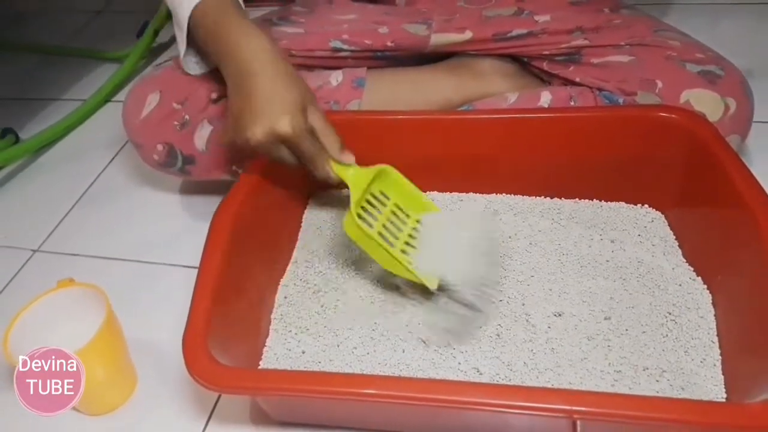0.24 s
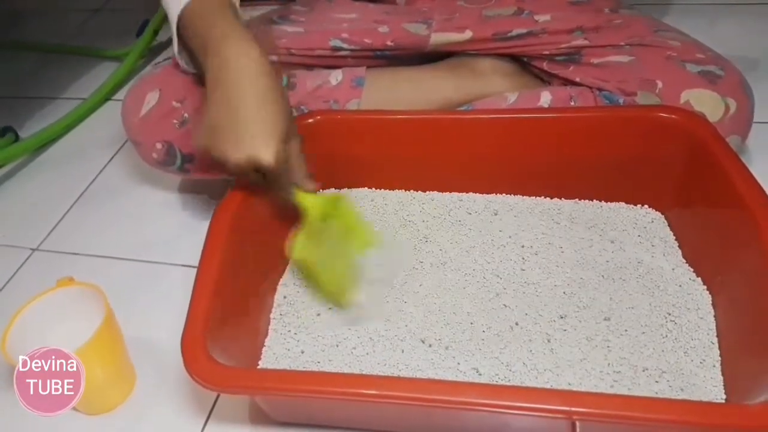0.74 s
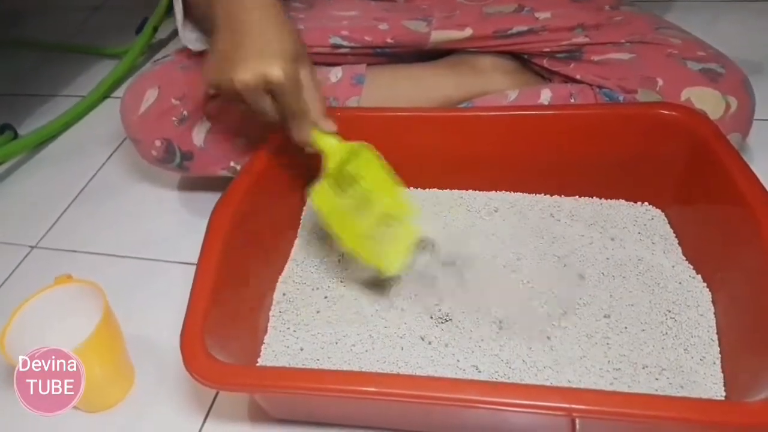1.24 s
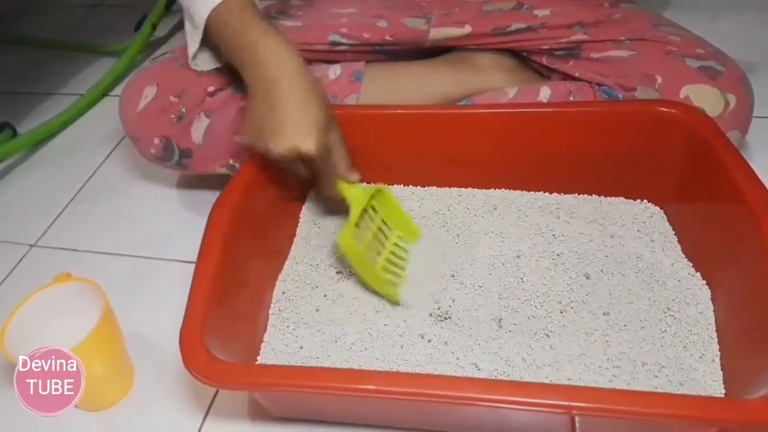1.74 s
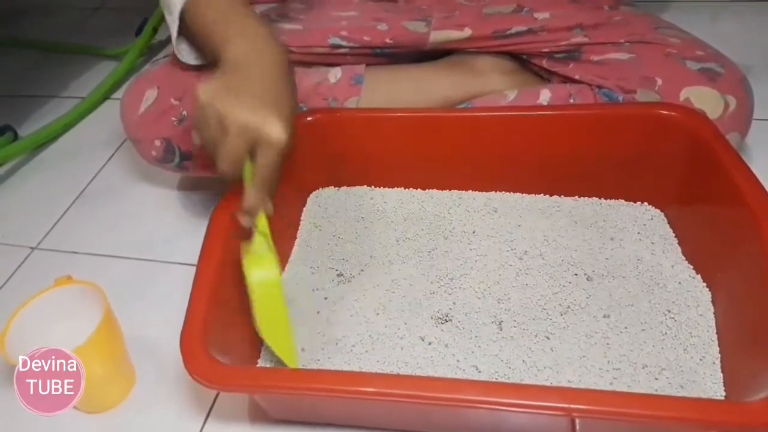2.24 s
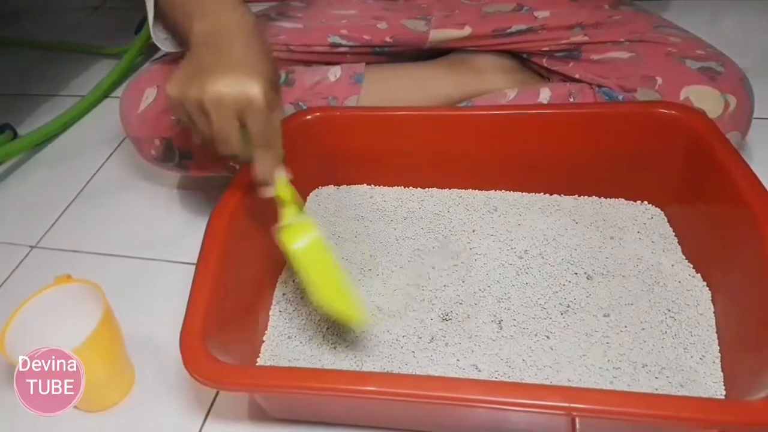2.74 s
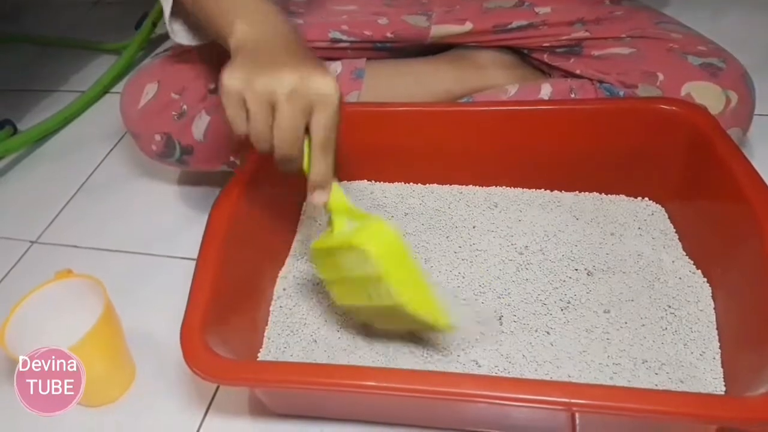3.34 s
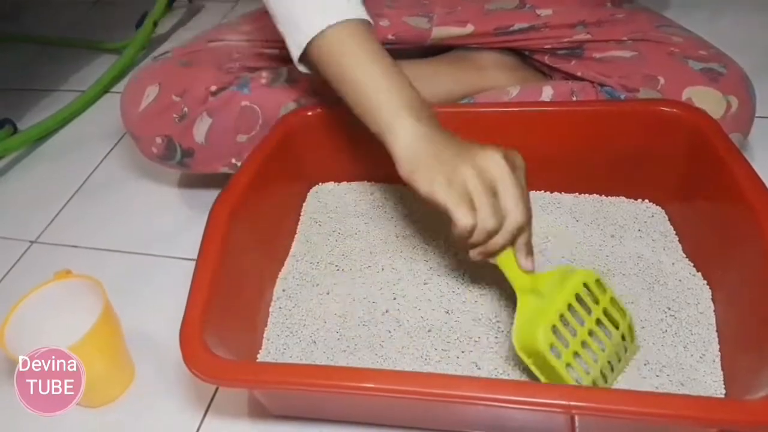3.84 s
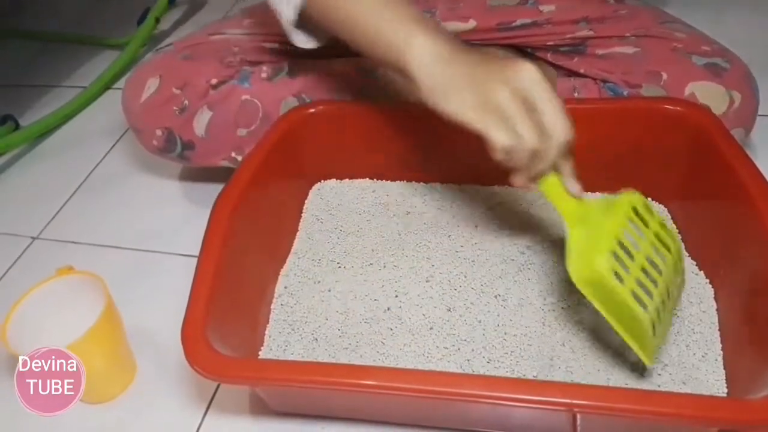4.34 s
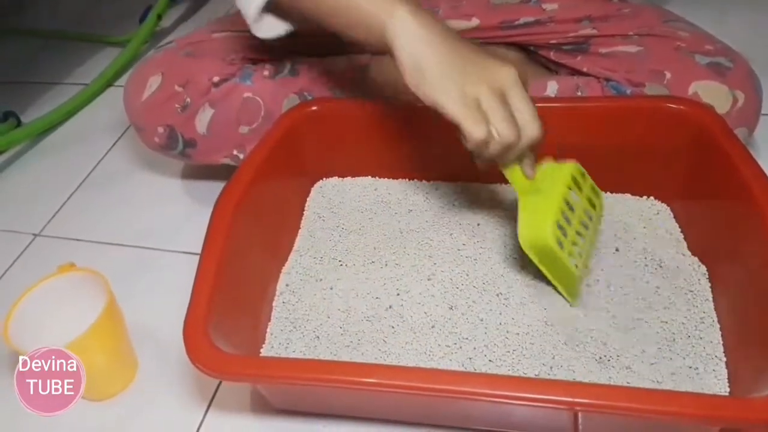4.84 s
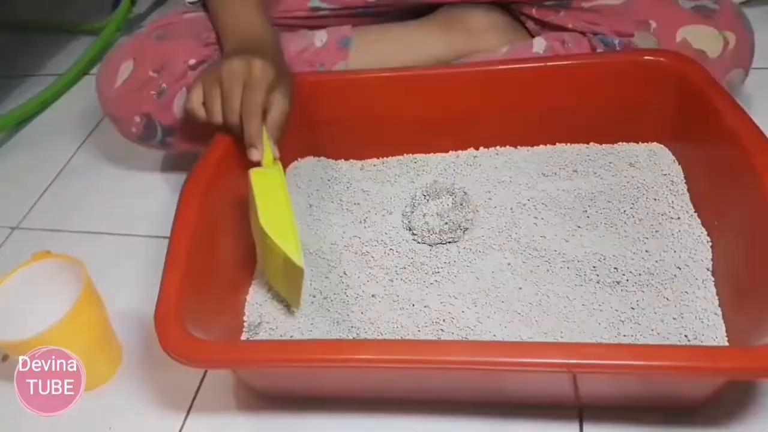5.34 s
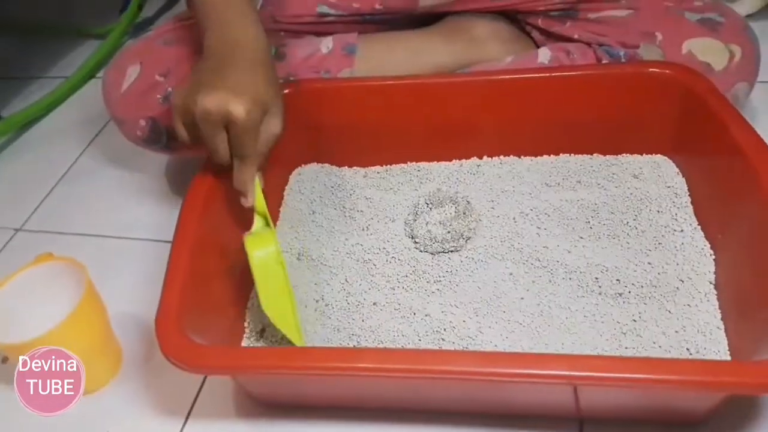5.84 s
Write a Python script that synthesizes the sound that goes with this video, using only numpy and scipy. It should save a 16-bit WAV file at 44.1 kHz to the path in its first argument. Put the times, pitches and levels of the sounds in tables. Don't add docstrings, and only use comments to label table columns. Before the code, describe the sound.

Close, dry, nearly mono phone sound in a quiet tiled room with a low hum and faint hiss. A dying trickle of grains opens; at 0.25 s a plastic scoop cracks into clay litter, the tub booms briefly, and a strong sandy rush peaks around 0.4 s, then fades. Around 0.7 s a light dusty trickle. At 1.03 s a juddering burst of knocks and another bright pour; at 1.9 s a third rattling bite and rush. A duller tub bump at 2.65 s leads to a softer pour near 2.9 s. At 3.3 s another dig, with sharp clicks at 3.43 s and grains falling. A barely audible thin squeak passes around 4 s. Softer scrape at 4.2 s, then a smooth gritty pour at 4.9-5.2 s. Quiet follows; small clicks and an abruptly cut rush at 5.6 s, a momentary dip, then near silence until a faint grain stir at 6 s.

```python
import sys
import numpy as np
from scipy import signal
from scipy.fft import rfft, irfft, next_fast_len
from scipy.io import wavfile
from scipy.ndimage import uniform_filter1d, minimum_filter1d

SR = 44100
rng = np.random.default_rng(int(sys.argv[2]) if len(sys.argv) > 2 else 0)


def unload_audio(sound):
    columns = np.transpose(np.atleast_2d(sound))
    steps = np.round(np.clip(columns, -1, 1) * 32767)
    wavfile.write(sys.argv[1], SR, steps.astype(np.int16))


def magnitude_from_level(level_db):
    exponent = np.asarray(level_db, float) / 20
    return 10 ** exponent


N = 268877
TIME = np.arange(N) / SR
FLOW_TIME = TIME[::32]
BLOW_N = 4096


def unit(x):
    return x / np.sqrt(np.mean(x ** 2))


def colour(x, spectrum):
    hz, db = np.transpose(spectrum)
    size = next_fast_len(N)
    axis = np.log(np.arange(size // 2 + 1) * SR / size + 1e-9)
    gain = magnitude_from_level(np.interp(axis, np.log(hz), db))
    return irfft(rfft(x, size) * gain, size)[:N]


def passband(x, low_hz, high_hz, order=2):
    edges_hz = [low_hz, min(high_hz, 15000)]
    return signal.sosfilt(signal.butter(order, edges_hz, "bandpass", fs=SR, output="sos"), x)


def walk(rate_hz):
    hold = int(SR / rate_hz)
    levels = np.repeat(rng.standard_normal(N // hold + 1), hold)
    return uniform_filter1d(levels, hold)[:N]


def impacts(rate_hz, spread_db):
    hit = rng.random(N) < rate_hz / SR
    hardness = np.minimum(rng.exponential(1, N), 4.5)
    sign = 2 * (rng.random(N) < 0.5) - 1
    return hit * magnitude_from_level(spread_db * hardness) * sign


def ring(x, modes, damp=1., apart=0):
    out = 0
    for k, (hz, db, t60_s) in enumerate(modes):
        pole = np.exp(2j * np.pi * hz / SR - np.log(1000) / (damp * t60_s * SR))
        mode = signal.lfilter([1], [1, -pole], np.roll(x, k * apart)).imag
        out = out + magnitude_from_level(db) * mode
    return out


def surge(start_s, swell_s, db, hold_s, fall_db_s):
    late_s = FLOW_TIME - start_s
    swell = np.sin(np.pi / 2 * np.clip(late_s / swell_s, 0, 1))
    return swell * magnitude_from_level(db - fall_db_s * np.clip(late_s - swell_s - hold_s, 0, 1))


# frequency in Hz, density in dB per Hz.
MURMUR_SPECTRUM = [(15, -78), (25, -18), (53, -21.5), (71, -3), (116, -3.5), (189, -5), (347, -16.5),
                   (386, -10), (487, -17.5), (543, -13.5), (1260, -25), (1560, -30), (1800, -46.5),
                   (2340, -83), (3960, -120)]


def murmur():
    return magnitude_from_level(-54 + 0.66 * walk(1.7)) * unit(colour(rng.standard_normal(N), MURMUR_SPECTRUM))


# frequency in Hz, density in dB per Hz.
HISS_SPECTRUM = [(1060, -27), (1800, -2.5), (2330, -5.5), (2520, -8.5), (6730, -16), (9280, -7.5),
                 (12300, -35), (16000, -74), (22000, -120)]


def hiss():
    return magnitude_from_level(-74) * unit(colour(rng.standard_normal(N), HISS_SPECTRUM))


# frequency in Hz, density in dB per Hz.
GRANULE_SPECTRUM = [(1180, -31.5), (2000, -21.5), (2490, -8), (2950, -6.5), (3410, -5), (4160, -1),
                    (5720, -4), (7140, -0.5), (7940, -1), (9250, 2.5), (11200, -13.5), (11800, -26.5),
                    (12400, -37.5), (16100, -81.5), (22000, -120)]


def granule_clicks():
    granules = colour(impacts(7000, spread_db=2.0), GRANULE_SPECTRUM)
    return passband(granules, 1500, 6140, order=3), passband(granules, 5870, 17000, order=3)


# mode in Hz, level in dB, t60 in seconds.
TUB_MODES = [(198.5, -9.5, 0.19), (322, -12.5, 0.077), (406, -4.5, 0.055), (491.4, -7.5, 0.071),
             (540, -13.5, 0.17), (633, 1, 0.05), (729, 0.5, 0.058), (847, 1.5, 0.025), (962, 3, 0.018)]


def tub_drumming():
    drumming = ring(impacts(1500, spread_db=2.0), TUB_MODES, damp=0.96, apart=9973)
    return passband(drumming, 130, 2000)


# mode in Hz, level in dB, t60 in seconds.
BLADE_MODES = [(1181, -2.5, 0.0152), (1430, -1.5, 0.014), (1615, -10.5, 0.042), (1787, -1, 0.014),
               (2042, 0.5, 0.013), (2300, -4.5, 0.023), (2566, 0, 0.0052), (2908, -1, 0.013),
               (3470, -3, 0.0117), (4040, 2.5, 0.025)]


def blade_rattle():
    rattle = ring(impacts(3000, spread_db=0.5), BLADE_MODES, damp=0.6, apart=7919)
    return passband(rattle, 670, 3300)


BLADE_DB = -4

# start in seconds, swell in seconds, rush in dB, fall in dB/s, dust re rush in dB.
TRICKLES = [(-.02, 0.017, -53, 140, 5), (.67, 0.027, -49.5, 175, 10.5), (0.759, 0.014, -59.5, 123, 3.5),
            (1.45, 0.14, -58, 125, 8.5), (1.77, 0.027, -70.5, 120, 4), (2.15, 0.054, -46.5, 182, 10.5),
            (2.25, 0.14, -57.5, 137, -1), (3.03, 0.02, -47.5, 145, -4.5), (3.68, 0.063, -67.5, 170, 12),
            (4.419, 0.042, -48, 186, 7), (4.176, 0.009, -48, 202, 9), (4.867, 0.032, -48.5, 298, 12),
            (5.605, 0.036, -53, 1200, 13), (5.28, 0.016, -73, 303, 5), (5.34, 0.059, -60.5, 134, -18),
            (5.7, .03, -81, 304, -10)]


def trickles():
    return [(surge(s, swell_s, db, 0, fall_db_s), -7.5, dust_db, BLADE_DB)
            for s, swell_s, db, fall_db_s, dust_db in TRICKLES]


# start in seconds, rush in dB, hold in seconds, fall in dB/s, tub re rush in dB.
DIGS = [
    (0.244, -36, 0.0082, 402, -16),
    (0.257, -40, 0.059, 143.5, 14.5),
    (1.014, -41.5, 0.025, 297.5, -7.5),
    (1.045, -41.5, .052, 397, 10),
    (1.89, -49, 0.0088, 292.5, -3),
    (1.908, -44, 0.092, 200, 14),
    (2.649, -45, 0.0058, 250, 19.5),
    (2.655, -43.5, .12, 220, 12),
    (3.306, -44.5, 0.081, 195, 8.5),
    (4.177, -44, 0.047, 165, 7),
]


def digs():
    parts = []
    for s, db, hold_s, fall_db_s, tub_db in DIGS:
        tub_fading_db = tub_db - 89.5 * np.clip(FLOW_TIME - s, 0, 1)
        parts.append((surge(s, 0.004, db, hold_s, fall_db_s), tub_fading_db, -1, BLADE_DB + 2.5))
    return parts


def struck(modes, spot_hz, fall_db, damp):
    near = [(hz, db - fall_db * abs(np.log2(hz / spot_hz)), t60_s) for hz, db, t60_s in modes]
    blow = passband(ring(np.arange(BLOW_N) == 0, near, damp), 0.41 * spot_hz, 2.8 * spot_hz)
    return blow / np.abs(blow).max()


def add_knock(out, start_s, blade_db, tub_db, tick_db, blade_hz, tub_hz):
    decay = np.exp(-np.arange(BLOW_N) / SR / 0.0015)
    tick = passband(rng.standard_normal(BLOW_N) * decay, 3300, 8300)
    tick = magnitude_from_level(tick_db + 4.5) * tick / np.abs(tick).max()
    blade = struck(BLADE_MODES, blade_hz, fall_db=25.5, damp=1.1)
    tub = magnitude_from_level(tub_db) * struck(TUB_MODES, tub_hz, fall_db=33, damp=0.83)
    at = int((start_s + 0.0004) * SR)
    out[at:at + BLOW_N] += magnitude_from_level(blade_db - 7) * (blade + tub + tick)


# start in seconds, blade in dB, tick re
# blade in dB, blade spot in Hz.
CLICKS = [(.2459, -43, -7, 4040), (.2597, -20, 13.5, 4000), (1.0157, -31, 0, 3960), (1.115, -40, -2, 3800),
          (1.808, -45.5, 3, 2230), (1.891, -38, 0, 4030), (1.9034, -22, -14, 2110), (1.9215, -23, 13, 2080),
          (2.6483, -24, 10.5, 2510), (3.3095, -42, 6, 2100), (4.175, -42, 3.5, 1900),
          (1.028, -37, -1, 3900), (3.053, -22, -20, 2350), (3.4233, -13, -15, 3720),
          (3.4339, -15.5, -13, 2240), (3.7883, -54, 17.5, 4210), (4.3306, -33, -7, 3900),
          (4.5114, -48, 10, 3840), (4.8816, -49, -13.5, 3430), (5.377, -48, -26, 1530),
          (5.6222, -28, -20, 2660), (5.6464, -27, -12, 3210), (5.9868, -49, -6, 4260)]


def lump_clicks():
    out = np.zeros(N + BLOW_N)
    for s, blade_db, tick_db, blade_hz in CLICKS:
        add_knock(out, s, blade_db, -16, tick_db, blade_hz, 620)
    return out[:N]


# start in seconds, blade in dB, tub re blade in dB, blade spot in Hz, tub spot in Hz.
BLOWS = [(0.2597, -6, -0.5, 2020, 620), (0.299, -33, -28, 2270, 355), (.3046, -16, 3, 2040, 595),
         (.3077, -0.5, -22, 2970, 824), (1.0367, -20, -2.5, 3880, 748), (1.0396, -13, -3.5, 3740, 568),
         (1.0421, -10, -10.5, 2280, 540), (1.0493, -2, -4, 2280, 668), (1.0562, -7.5, -4, 2500, 684),
         (1.0595, -1, -11, 2700, 640), (1.063, -10, -22, 2410, 637), (1.9077, -8.5, -16, 2070, 899),
         (1.9102, -13, 2.5, 2300, 619), (1.915, -13, -3, 2310, 644), (1.9179, -4, -5.5, 2000, 867),
         (1.9222, -7, 2, 1580, 662), (1.9254, -4.5, -12, 1510, 633), (2.6479, -16.5, 9.5, 3420, 584),
         (2.6526, -25, 1.5, 1950, 730), (3.3059, -27, 10, 2010, 720), (3.3098, -12.5, -4.5, 2200, 630),
         (3.315, -23, 7.5, 3220, 412), (4.1735, -24.5, 4.5, 1890, 482)]


def blade_blows():
    out = np.zeros(N + BLOW_N)
    for s, blade_db, tub_db, blade_hz, tub_hz in BLOWS:
        add_knock(out, s, blade_db, tub_db, -12.5, blade_hz, tub_hz)
    return out[:N]


# start in seconds, swell in seconds, rush in dB, fall in dB/s, tub re rush in dB.
POURS = [(0.344, 0.0084, -40, 150, 0), (0.353, 0.053, -31, 127, -1.5), (.49, 0.12, -44.5, 112, -20.5),
         (1.103, 0.023, -35, 105, -3), (1.12, 0.03, -35, 91.5, -26), (1.189, 0.06, -38, 160, -3),
         (1.35, 0.059, -45, 70, -16), (1.941, 0.12, -41, 85, -3.5), (2.019, 0.078, -37, 170, -7),
         (2.8, 0.037, -52.5, 200, 1.5), (2.851, 0.056, -38.5, 115, -6), (3.388, 0.032, -37.5, 350, -4),
         (3.45, 0.033, -43, 148, -3), (3.498, 0.088, -37.5, 203, -6), (3.57, .07, -45.5, 151, -9.5),
         (4.316, 0.04, -42, 131, -6), (4.335, 0.09, -46.5, 169, -13), (4.865, 0.067, -39.5, 155, -3),
         (4.97, 0.067, -41, 95, -7), (5.01, 0.052, -39.5, 107.5, -17), (5.06, 0.094, -44.5, 163, -15),
         (5.604, 0.041, -48, 898, 3), (5.981, 0.017, -55.5, 220.5, -6.5)]


def pours():
    return [(surge(s, swell_s, db, 0.004, fall_db_s), tub_db, 1, BLADE_DB)
            for s, swell_s, db, fall_db_s, tub_db in POURS]


def flows():
    idle_db = np.array([[-140], [-66.5], [-83.5], [-140]])
    power = np.zeros((4, len(FLOW_TIME))) + magnitude_from_level(idle_db) ** 2
    for flow, tub_db, dust_db, blade_db in trickles() + digs() + pours():
        rattle_db = 0.37 * tub_db + blade_db
        for k, db in enumerate((0, tub_db, rattle_db, dust_db)):
            power[k] += (flow * magnitude_from_level(db)) ** 2
    return np.array([np.interp(TIME, FLOW_TIME, np.sqrt(p)) for p in power])


def strokes():
    rush, *shares = flows() * magnitude_from_level(1.5 * walk(35))
    coarse, dust = granule_clicks()
    out = rush * magnitude_from_level(0.73 * walk(22)) * unit(coarse)
    for layer, share in zip((tub_drumming(), blade_rattle(), dust), shares):
        out += share * magnitude_from_level(1.8 * walk(21)) * unit(layer)
    return out


def tiled_echo(near):
    t = np.arange(16384) / SR
    echo = rng.standard_normal(16384) * magnitude_from_level(-60 * t / 0.22) * (t > 0.004)
    return signal.fftconvolve(near, magnitude_from_level(-13) * echo / np.sqrt(np.sum(echo ** 2)))[:N]


# time in seconds, pitch in Hz, level in dB.
SQUEAK = [
    (3.918, 1570, -88),
    (3.97, 1570, -75),
    (4.09, 1585, -73),
    (4.15, 1590, -86),
]


def squeak():
    s, hz, db = np.transpose(SQUEAK)
    pitch_hz = np.interp(TIME, s, hz) * (1 + 0.012 * walk(60))
    level_db = np.interp(TIME, s, db, -140, -140) + 2.8 * walk(40)
    return magnitude_from_level(level_db) * np.sin(2 * np.pi * np.cumsum(pitch_hz) / SR)


# time in seconds, level in dB.
CHANGE = [
    (5.651, 0),
    (5.666, -28),
    (5.686, -28),
    (5.696, 0),
]


def scene_change():
    s, db = np.transpose(CHANGE)
    return magnitude_from_level(np.interp(TIME, s, db))


def scene():
    near = strokes() + lump_clicks() + blade_blows()
    room = murmur() + hiss() + squeak()
    mix = (near + tiled_echo(near) + room) * scene_change()
    return np.tile(mix, (2, 1))


def noise_filled(x, fill_hz, top_hz):
    hz, s, z = signal.stft(x, SR, "cosine", 1024)
    band = np.sqrt(uniform_filter1d(np.abs(z) ** 2, size=12, axis=1) + 1e-18)
    noise = rng.standard_normal(z.shape) + 1j * rng.standard_normal(z.shape)
    filled = magnitude_from_level(0.95) * band * noise
    treble_power = np.mean(np.abs(z[0, hz > fill_hz]) ** 2, axis=0)
    treble_db = 10 * np.log10(uniform_filter1d(treble_power, size=3) + 1e-18)
    slope_db_s = np.gradient(treble_db, s)
    steady = np.abs(uniform_filter1d(slope_db_s, size=5)) < 70
    steady &= minimum_filter1d(1 * (slope_db_s < 330), size=5, origin=1) > 0
    chance = np.kron(rng.random((33, len(s) // 4 + 1)), np.ones((16, 4)))[:len(hz), :len(s)]
    kept = chance < np.interp(hz, [4000, 5500], [0.3, 0.03])[:, None]
    swap = np.outer((hz > fill_hz) & (hz < top_hz), steady) & ~kept
    return signal.istft(np.where(swap, filled, z), SR, "cosine", 1024)[1][:, :N]


def top_cut(x):
    return signal.sosfilt(signal.butter(12, 12510, fs=SR, output="sos"), x)


def record(dry):
    top_hz = 11800
    cut = signal.sosfilt(signal.ellip(8, 0.2, 60, top_hz, fs=SR, output="sos"), dry)
    mix = noise_filled(cut, 4050, top_hz)
    return top_cut(mix)


dry = scene()
out = record(dry)
unload_audio(out)
```